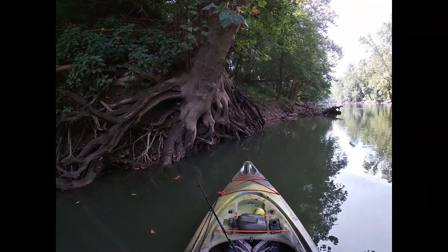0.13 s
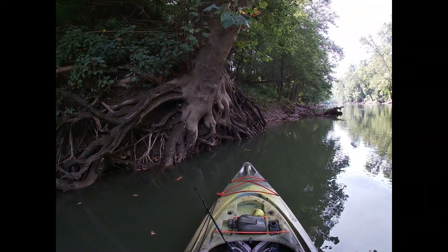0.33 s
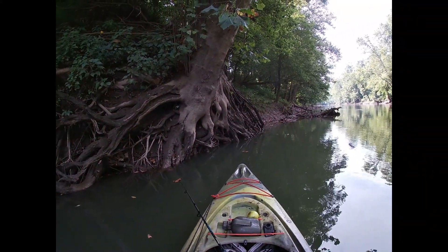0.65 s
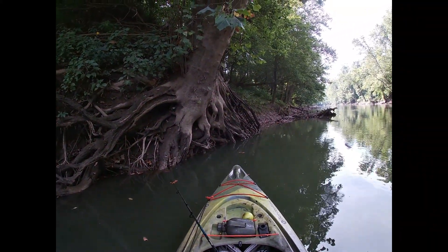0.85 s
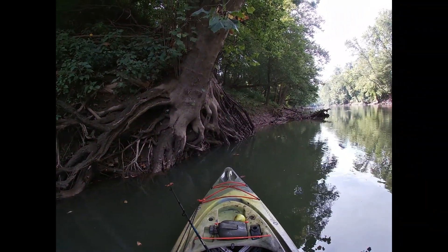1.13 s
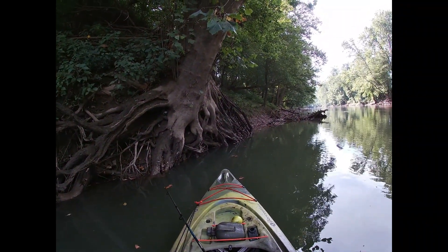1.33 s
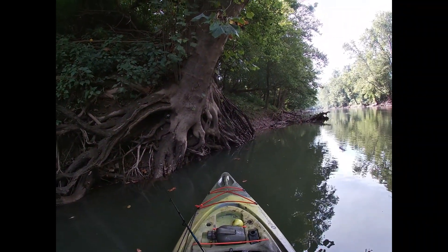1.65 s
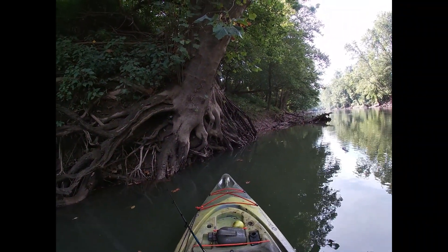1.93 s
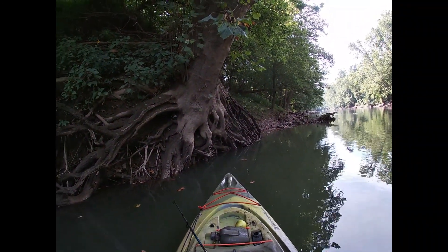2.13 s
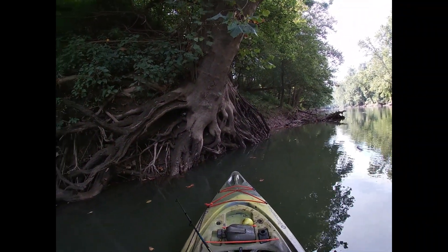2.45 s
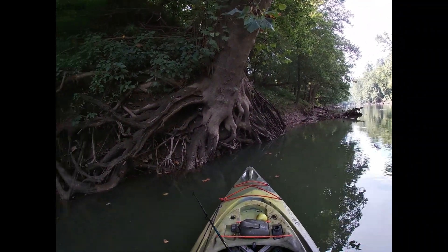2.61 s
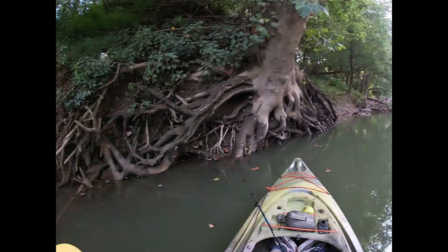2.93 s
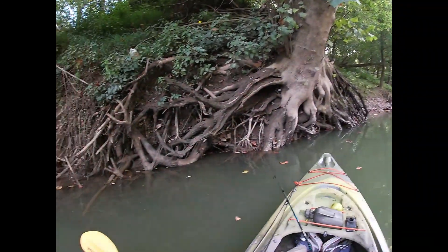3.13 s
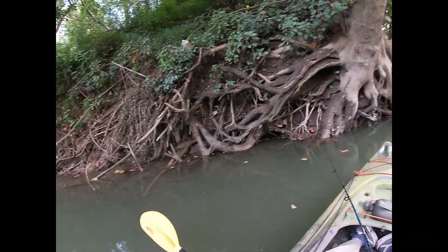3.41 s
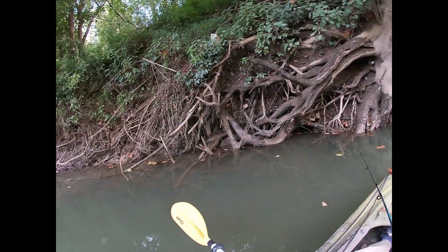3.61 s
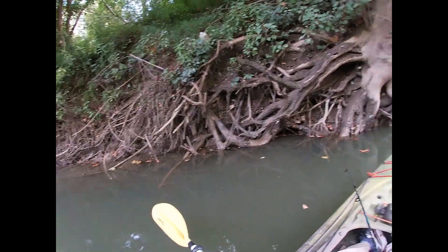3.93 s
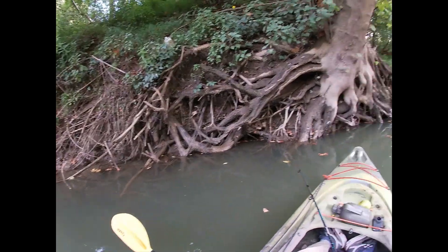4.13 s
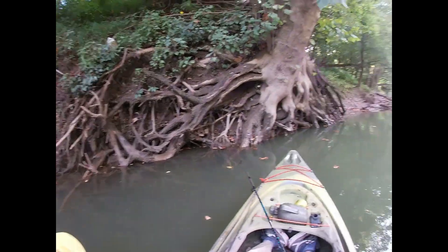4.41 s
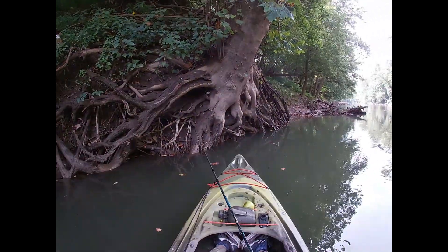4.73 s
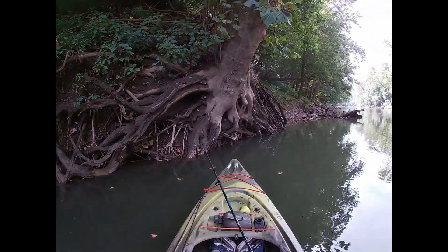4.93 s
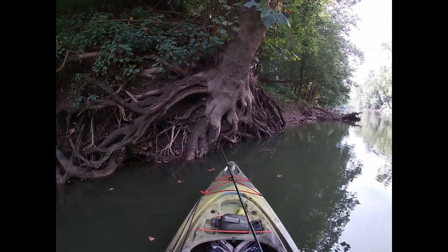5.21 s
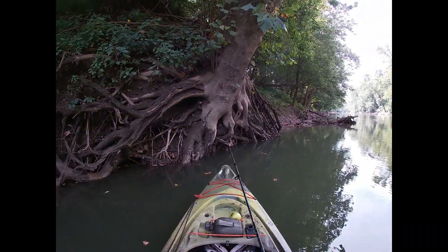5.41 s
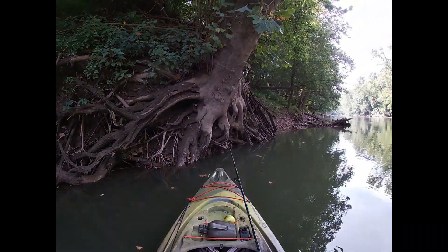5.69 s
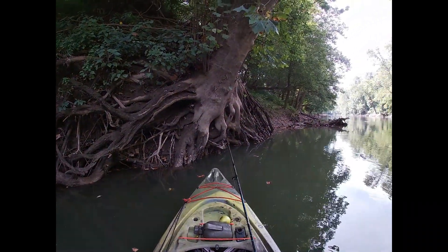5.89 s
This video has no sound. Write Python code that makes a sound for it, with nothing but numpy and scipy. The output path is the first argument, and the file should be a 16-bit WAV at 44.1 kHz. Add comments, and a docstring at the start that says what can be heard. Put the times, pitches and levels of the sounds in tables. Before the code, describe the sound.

A steady shrill insect buzz, a bird's quick falling trill three times, and soft drips and light paddle knocks on a kayak.

```python
"""A wooded river bank, heard from a drifting kayak. Cicadas drone high in the trees, their tymbal clicks
ringing resonant bodies, while a lower chorus swells and fades. Bubbles plip and the paddle excites the
modes of the hull over a low rumble and a soft wash. A far bird whistles thin arched calls, and a nearer
songbird sings a falling burr of swept chips three times; both reverberate among the trunks."""
import sys
import numpy as np
from scipy import signal
from scipy.fft import rfft, irfft, next_fast_len
from scipy.io import wavfile

SR = 44100
rng = np.random.default_rng(int(sys.argv[2]) if len(sys.argv) > 2 else 0)


def file_out(sig):
    """Save sig as 16-bit WAV at sys.argv[1]."""
    # one column per channel
    cols = np.atleast_2d(sig).T
    # limit, then scale
    lim = np.clip(cols, -1, 1)
    pcm = np.round(lim * 32767).astype(np.int16)
    wavfile.write(sys.argv[1], SR, pcm)


N = 267246
TIME = np.arange(N) / SR


def amp(db):
    """Amplitude ratio of a level in decibels."""
    return 10 ** (np.asarray(db) / 20)


def unit(x):
    """Normalisation to rms 1."""
    return x / np.sqrt(np.mean(x ** 2) + 1e-20)


def curve(rows):
    """Linear interpolation of (time_s, value) rows at every sample."""
    return np.interp(TIME, *np.transpose(rows))


def read(points, hz):
    """Interpolation of (frequency_hz, value) rows on a log-frequency axis."""
    point_hz, value = np.transpose(points)
    return np.interp(np.log(hz + 1), np.log(point_hz + 1), value)


def colour(x, spectrum):
    """Spectral shaping: x is filtered by a gain curve and brought to rms 1."""
    size = next_fast_len(N)
    gain = amp(read(spectrum, np.fft.rfftfreq(size, 1 / SR)))
    return unit(irfft(rfft(x, size) * gain, size)[..., :N])


def wander(rate_hz):
    """Random modulation of rms 1: a sum of sines of random phase, none faster than rate_hz."""
    t = np.append(TIME[::128], TIME[-1])
    hz = np.geomspace(rate_hz / 10, rate_hz, num=20)[:, None]
    sines = np.sin(2 * np.pi * (hz * t + rng.random(hz.shape)))
    return unit(np.interp(TIME, t, sines.sum(0)))


def add(mix, start_s, sound):
    """Superposition of a sound on the mix from start_s onward."""
    part = mix[max(round(start_s * SR), 0):][:len(sound)]
    part += sound[:len(part)]


def tymbals(click_hz, jitter, scatter_db, count):
    """Impulse trains: each insect buckles its tymbals at its own pace; leaves scatter them into hiss."""
    clicks = np.zeros(N)
    for _ in range(count):
        pace_hz = click_hz * rng.uniform(.6, 1.4) * (1 + jitter * wander(60))
        beats = np.diff(np.floor(np.cumsum(pace_hz) / SR), prepend=0)
        clicks += beats * rng.uniform(0.97, 1) * (1 + 0.3 * rng.standard_normal(N))
    return unit(clicks - clicks.mean()) + amp(scatter_db) * rng.standard_normal(N)


def cicada_drone(level_db=-37.5, drift_db=0.19, throb_db=-0.07):
    """Resonance: clicks ring the cicadas' hollow bodies near 6.7 kHz; the level wavers slightly."""
    # response of the bodies: frequency_hz, gain_db
    resonance = [(3500, -44.5), (5300, -34), (5800, -18.5), (6050, -10.5), (6350, -1.5), (6680, 0),
                 (6900, 0.5), (7100, -5.5), (7350, -5.5), (7600, -14), (7950, -14), (8250, -23),
                 (8550, -42.5), (9500, -55), (12000, -82)]
    buzz = colour(tymbals(click_hz=309.5, jitter=.06, scatter_db=1.0, count=6), resonance)
    return buzz * amp(level_db + drift_db * wander(4) + throb_db * wander(30))


def cicada_chorus(body_db=3.0, fizz_db=-66):
    """Periodic excitation: even clicks leave faint harmonics in a lower chorus that swells and fades."""
    # spectrum of the chorus: frequency_hz, gain_db
    body_spectrum = [(1300, -42), (2000, -31.5), (2450, -16.5), (2750, -13.5), (3400, -9), (3900, -7.5),
                     (4300, -7), (4900, -8), (5600, -5.5), (6200, -6), (7800, -37), (11000, -80)]
    # its swell, before body_db is added: time_s, level_db
    body_swell = [(0, -55), (2.0, -53.5), (3.15, -51), (4.75, -51), (5.15, -55), (6.06, -58.5)]
    # spectrum of the insects' fizzing overtones: frequency_hz, gain_db
    fizz_spectrum = [(6000, -47), (8300, 6.5), (9000, 1.5), (9950, -2.5), (10700, 2), (11400, -6.5),
                     (12400, -11.5), (13100, -10.5), (14050, -16), (14600, -17), (15200, -16), (17000, -40)]
    # swell of the fizz about fizz_db: time_s, gain_db
    fizz_swell = [(0, -2), (3.1, 0), (3.9, 3), (5.1, 1.4), (5.3, -1.5), (6.06, -2)]
    buzz = tymbals(click_hz=287.0, jitter=.004, scatter_db=4.5, count=2)
    body = colour(buzz, body_spectrum) * amp(curve(body_swell) + body_db + 0.13 * wander(12))
    fizz = colour(tymbals(click_hz=378, jitter=0.099, scatter_db=2, count=6), fizz_spectrum)
    return body + fizz * amp(fizz_db + curve(fizz_swell))


def far_insects(level_db=-60):
    """Incoherent summation: countless insects on the far bank merge into one steady band of noise."""
    # spectrum of their shrill: frequency_hz, gain_db
    shrill = [(2000, -26), (2900, -3.5), (3400, -0.5), (4200, -9), (5500, -30.5)]
    return amp(level_db) * colour(rng.standard_normal(N), shrill)


def river_air(rumble_db=-56.5, surge_db=1.0, air_db=-68, rise_db_per_s=0.43, lap_db=1.12):
    """Amplitude-modulated noise: a far rumble, and a slowly growing wash of leaves and water."""
    # spectrum of the rumble: frequency_hz, gain_db
    rumble_spectrum = [(10, -7.5), (25, -8.5), (42, -3.5), (56, -0.5), (72, -9), (100, -8), (135, -2.5),
                       (160, -2), (175, 4), (192, -2.5), (225, -3.5), (270, -11), (340, -16.5),
                       (480, -29.5), (900, -42)]
    # spectrum of the wash over the river: frequency_hz, gain_db
    air_spectrum = [(220, -30.5), (380, -6.5), (445, -9), (586, -9), (725, -3), (869, -4.5), (948, -8.5),
                    (1630, -10), (2090, -11), (2500, -7), (3250, -39), (5500, -120)]
    # water washing along the hull: peak_s, length_s, boost_db
    washes = [(3.266, 0.34, 1), (4.794, .5, 2.5), (5.364, 0.2, 4.5), (6.02, 0.31, 3.5)]
    rumble = colour(rng.standard_normal(N), rumble_spectrum) * amp(rumble_db + surge_db * wander(8.3))
    wash_db = sum(db * np.exp(-(2 * (TIME - peak_s) / length_s) ** 2) for peak_s, length_s, db in washes)
    level_db = air_db + rise_db_per_s * TIME + wash_db + lap_db * wander(17)
    return rumble + colour(rng.standard_normal(N), air_spectrum) * amp(level_db)


def wide_hiss(level_db=-83):
    """Antiphase noise: a faint treble hiss sounds wide because its sign is opposite at the two ears."""
    # spectrum of the hiss: frequency_hz, gain_db
    spectrum = [(3000, -28), (9500, -33), (11500, 10), (14500, 16), (16000, -27)]
    return amp(level_db) * np.array([[1], [-1]]) * colour(rng.standard_normal(N), spectrum)


def ring(hz, db, t60_s, rise_s=0.00096):
    """Damped oscillation: one mode starts softly and decays by 60 dB in t60_s."""
    t = np.arange(SR // 5) / SR
    envelope = np.exp(-np.log(1000) * t / t60_s) * (1 - np.exp(-t / rise_s))
    return amp(db) * envelope * np.sin(2 * np.pi * hz * t)


def drips(per_s=9, floor_db=-60, spread_db=3):
    """Random impacts: water ticks on the roots and the hull, each tick one damped mode."""
    out = np.zeros(N)
    for when, pitch, size in rng.random((int(per_s * N / SR), 3)):
        level_db = floor_db + spread_db * min(-np.log(1 - size), 2.5)
        add(out, when * N / SR, ring(900 + 1700 * pitch, level_db, t60_s=0.023))
    return out


def kayak():
    """Free and forced vibration: bubbles and the struck hull ring; water pushes dully on the boat."""
    # bubbles: start_s, pitch_hz, level_db, t60_s
    plips = [(0.906, 1760, -47.5, 0.022), (1.345, 1720, -48, 0.012), (1.4, 1610, -45.5, 0.0085),
             (3.318, 2007, -47, 0.03), (4.512, 1750, -47, 0.012), (5.103, 1690, -55, .025),
             (5.472, 1800, -51, 0.019)]
    # paddle strikes: start_s, level_db, tilt_db_per_octave
    knocks = [(0.664, -55, -9.5), (0.679, -59, -8), (3.708, -56, -2), (5.200, -49, -3)]
    # modes of paddle and hull: pitch_hz, gain_db, t60_s
    hull_modes = [(432, -16, 0.03), (620, 2, 0.015), (854, -10, .03), (1270, 0.5, 0.021), (1654, 4, 0.028),
                  (2325, 10.5, 0.033), (2680, 5, .02)]
    # water nudging the hull: start_s, length_s, level_db, pitch_hz
    nudges = [(0.675, 0.19, -53, 60), (1.3, 0.1, -52.5, 90), (1.49, 0.087, -52, 65), (1.697, .25, -55, 45),
              (2.498, .15, -51.5, 50), (3.6, 0.26, -55, 44.7), (4.052, 0.57, -48, 21.65),
              (5.25, 0.12, -54, 165)]
    out = np.zeros(N)
    for start_s, hz, db, t60_s in plips:
        splash = ring(hz * 1.16, db + 10, t60_s / 2)
        add(out, start_s, ring(hz, db, t60_s) + splash)
    for start_s, db, tilt in knocks:
        for hz, mode_db, t60_s in hull_modes:
            add(out, start_s, ring(hz, db + mode_db + tilt * np.log2(hz / 1500), t60_s))
    for start_s, length_s, db, hz in nudges:
        band = signal.butter(2, [hz / 2, hz * 1.39], "band", fs=SR, output="sos")
        push = unit(signal.sosfilt(band, rng.standard_normal(N)))
        window = np.hanning(round(length_s * SR))
        add(out, start_s, amp(db) * window * push[-len(window):])
    return out


def whistle(length_s, top_hz, droop_hz_per_s2, break_db, break_s=0.037, quaver=.011, flutter_db=1.5):
    """Parabolic glide: a tone arches, may break at its top, and flutters on its way through the trees."""
    t = np.arange(round(length_s * SR)) / SR - .42 * length_s  # zero at the top of the arch
    pitch_hz = (top_hz - droop_hz_per_s2 * t ** 2) * (1 + quaver * wander(85.3)[:len(t)])
    db = break_db * np.exp(-(t / break_s) ** 2) + flutter_db * wander(44.0)[:len(t)]
    return amp(db) * signal.windows.tukey(len(t), .2) * np.sin(2 * np.pi * np.cumsum(pitch_hz) / SR)


def woods(x, early_db, early_t60_s, echoes_per_s=3000):
    """Reverberation: dense early reflections off trunks and water, then a long tail from the forest."""
    # reverberation time of the forest: frequency_hz, t60_s
    decay_times = [(300, .5), (2000, 1.3), (3000, 1.36), (8000, 0.62)]
    t = np.arange(SR) / SR
    echoes = rng.choice([-1., 1.], SR) * (rng.random(SR) < echoes_per_s / SR)
    hz, delay_s, spectra = signal.stft(echoes, SR, nperseg=256)
    late = amp(-60 * delay_s / read(decay_times, hz)[:, None])
    early = amp(early_db - 60 * delay_s / early_t60_s)
    onset = np.minimum(t / 0.002, 1) ** 2
    response = signal.istft(spectra * (late + early), SR, nperseg=256)[1][:SR] * onset
    return signal.fftconvolve(x, response / np.linalg.norm(response))[:N]


def far_bird(droop_hz_per_s2=23000, lower_hz=1494, reverb_db=-4):
    """Biphonation: arched whistles from deep in the woods, each over a shorter, lower second voice."""
    # the calls: start_s, length_s, top_hz, level_db, break_gain_db, lower_voice_gain_db
    calls = [(0.805, 0.172, 2190, -61, -8, -11), (1.683, 0.19, 2133, -61, 1.5, -15),
             (3.505, .2, 2190, -59, -9, -7), (5.648, 0.051, 2240, -61, -1, -6),
             (5.9, 0.046, 2270, -58.5, -2, -9), (5.959, 0.2, 2210, -60, -2, -6)]
    out = np.zeros(N)
    for start_s, length_s, top_hz, db, break_db, lower_db in calls:
        add(out, start_s, amp(db) * whistle(length_s, top_hz, droop_hz_per_s2, break_db))
        lower = whistle(0.487 * length_s, lower_hz, 0.97 * droop_hz_per_s2, break_db=0)
        add(out, start_s + 0.16 * length_s, amp(db + lower_db) * lower)
    return out + amp(reverb_db) * woods(out, early_db=1, early_t60_s=0.3)


def chip(hz, sweep_hz, length_s, bend=0.4):
    """Frequency sweep: a short tone with soft ends climbs ever faster through hz."""
    position = np.linspace(-.5, .5, round(length_s * SR))
    pitch_hz = hz + sweep_hz * (position + bend * position ** 2)
    return signal.windows.tukey(len(position), .8) * np.sin(2 * np.pi * np.cumsum(pitch_hz) / SR)


def trill(top_hz, end_hz, fade_db, count=13, swell_db=11.5, crest=0.49, duty=.82):
    """Modulated pulse train: chips slow, sink and narrow in sweep under one swell, a little unevenly."""
    first_gap_s, slowing_s, longest_gap_s = .0125, .0024, .03
    first_sweep_hz, last_sweep_hz = 850, 304
    gaps_s = np.minimum(first_gap_s + slowing_s * np.arange(count), longest_gap_s)
    delay_s = np.cumsum(gaps_s) - gaps_s
    progress = delay_s / delay_s[-1]
    stray_s, stray_hz, stray_db = (rng.standard_normal((count, 3)) * [.001, 25.6, 0.5]).T
    sink = np.sin(np.pi * progress / 2) ** 2.61  # the pitch holds, sinks and levels off
    hz = top_hz + (end_hz - top_hz) * sink + stray_hz
    sweep_hz = first_sweep_hz + (last_sweep_hz - first_sweep_hz) * progress ** 3
    rising = np.maximum(1 - progress / crest, 0)
    fading = np.maximum(progress - crest, 0) / (1 - crest)
    db = stray_db - swell_db * rising ** 2 - fade_db * fading ** 3
    return list(zip(delay_s + stray_s, hz, sweep_hz, duty * gaps_s, db))


def songbird(echo_db=-13, carry_db_per_hz=0.0059):
    """Direct and reflected sound: a high lead-in and a trill, whose higher chips carry further."""
    # the songs: start_s, direct_db, into_trees_db, lead_gain_db, top_hz, end_hz, fade_db
    songs = [(0.887, -34.5, -38, -6, 3360, 2780, 13.5), (2.6326, -38, -38.5, -2.5, 3505, 2665, 7),
             (4.3106, -36.5, -40, -11, 3425, 2730, 7)]
    direct, into_trees = np.zeros(N), np.zeros(N)
    for start_s, direct_db, trees_db, lead_db, top_hz, end_hz, fade_db in songs:
        lead = (-0.024, 4807, 890, .011, lead_db)
        for delay_s, hz, sweep_hz, length_s, db in [lead] + trill(top_hz, end_hz, fade_db):
            sound = chip(hz, sweep_hz, length_s)
            onset_s = start_s + delay_s - length_s / 2
            carry_db = carry_db_per_hz * (min(hz, top_hz) - (top_hz + end_hz) / 2)
            add(direct, onset_s, amp(direct_db + db) * sound)
            add(into_trees, onset_s, amp(trees_db + db + carry_db) * sound)
    echoes = np.zeros(N)
    for lag_s in rng.uniform(.004, .03, 4):  # single reflections off the nearest trunks
        add(echoes, lag_s, amp(echo_db) * into_trees)
    return direct + echoes + woods(into_trees, early_db=2, early_t60_s=0.23)


def scene():
    """Superposition: all sources add in the centre, and only the treble hiss is spread."""
    cicadas = cicada_drone() + cicada_chorus()
    birds = songbird() + far_bird()
    water = kayak() + drips()
    background = river_air() + wide_hiss() + far_insects()
    return cicadas + birds + water + background


def record(dry, cutoff_hz=15300):
    """Band limiting: a steep linear-phase low-pass removes the highest treble."""
    lowpass = signal.firwin(511, cutoff_hz, window=("kaiser", 9), fs=SR)
    return signal.oaconvolve(dry, lowpass[None], "same")


dry = scene()
out = record(dry)
file_out(out)
```